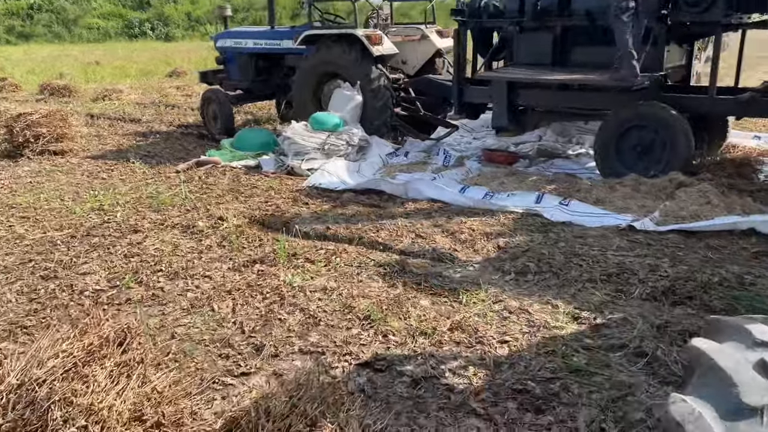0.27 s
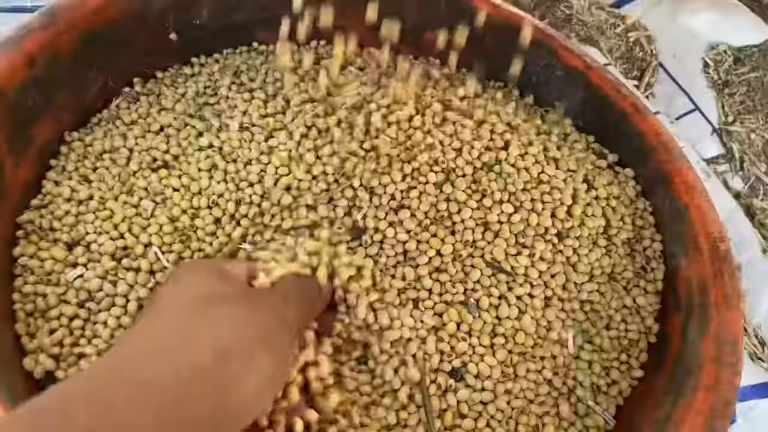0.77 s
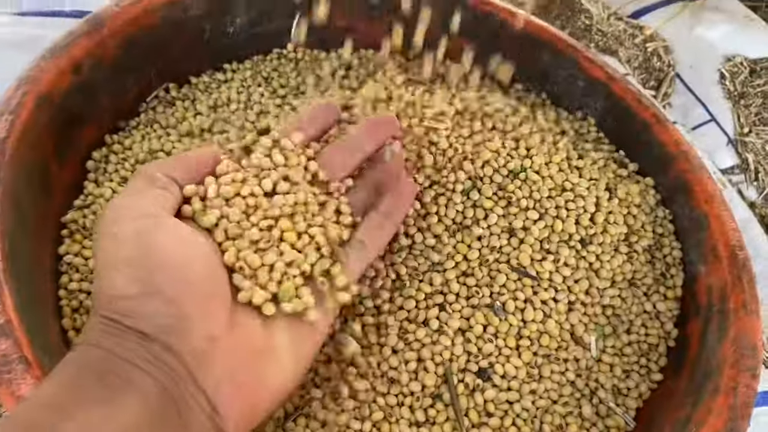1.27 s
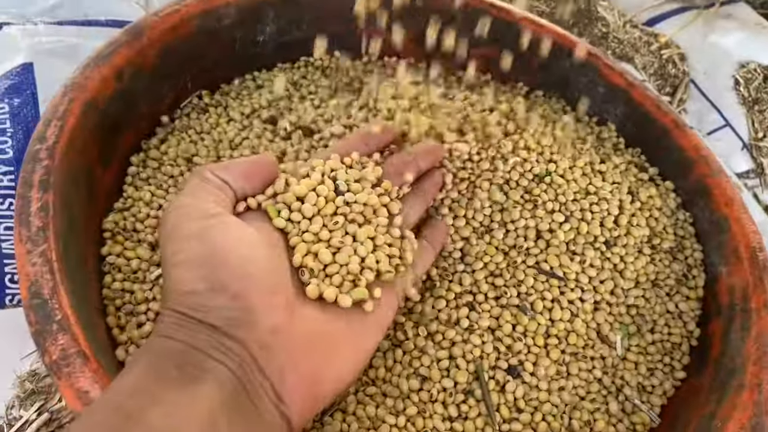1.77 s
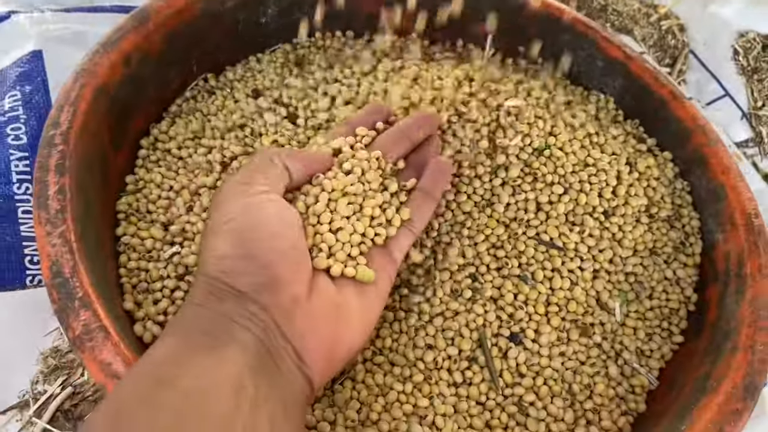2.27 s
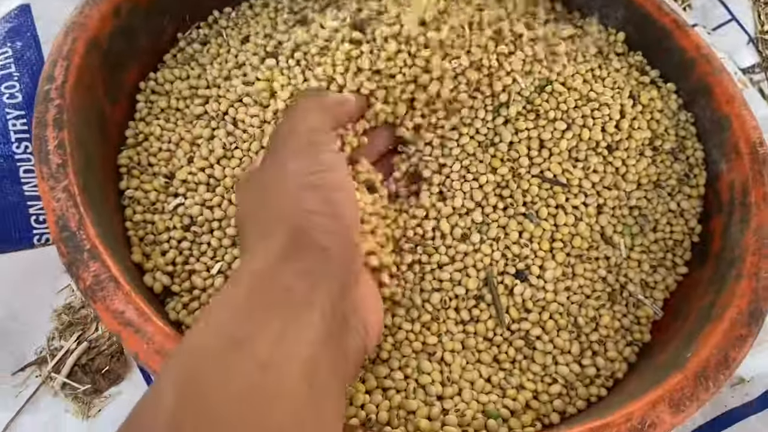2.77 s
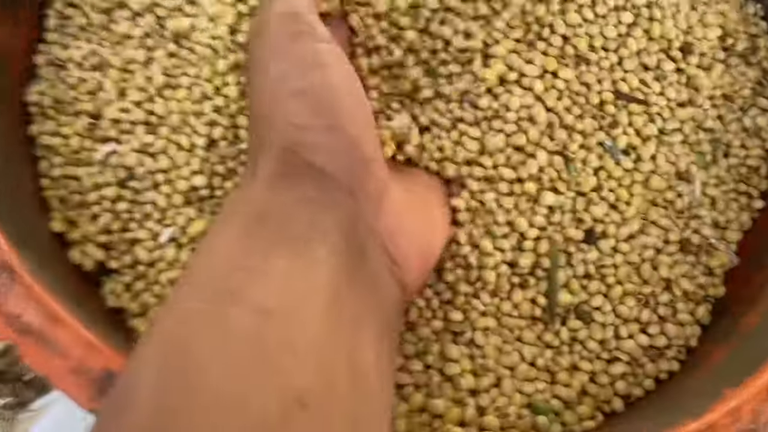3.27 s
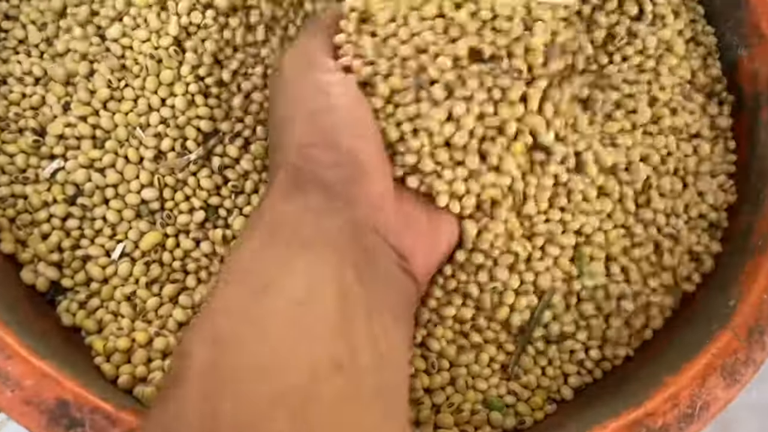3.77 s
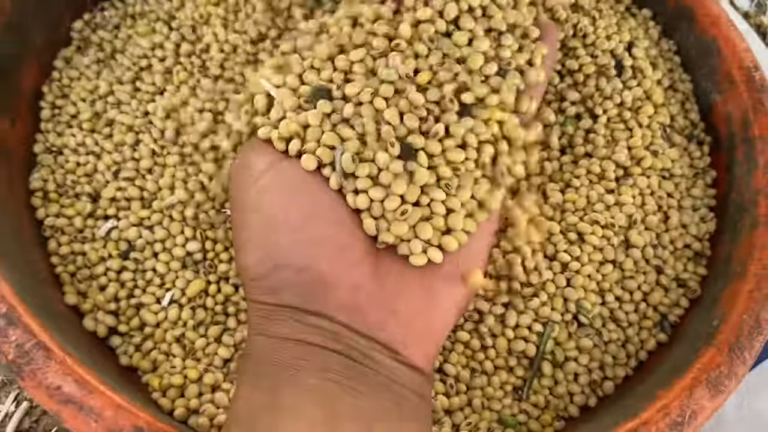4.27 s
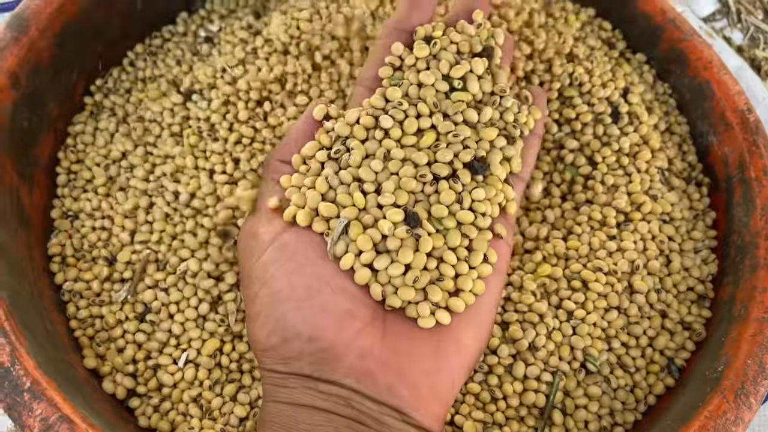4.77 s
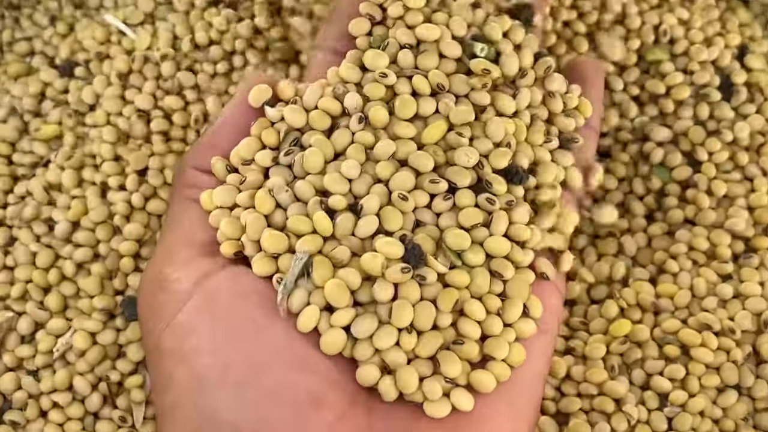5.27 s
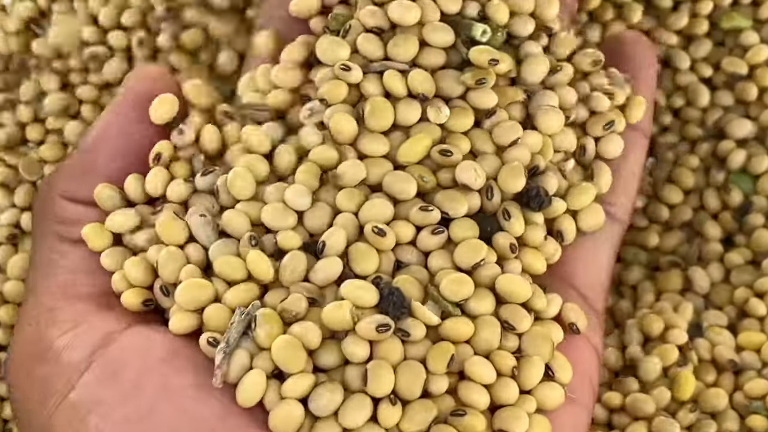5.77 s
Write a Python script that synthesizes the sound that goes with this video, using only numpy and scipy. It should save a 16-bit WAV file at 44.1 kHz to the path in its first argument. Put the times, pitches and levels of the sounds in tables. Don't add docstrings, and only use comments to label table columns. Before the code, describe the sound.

A low, buzzing tractor exhaust beats slowly against the thresher's blower, first heard across open ground with thinner hissing rattle. After a brief cut the sound is close, fuller and brighter: rumbling drum, rushing straw and dense beans pulsing rapidly with the sieve. Little muffled puffs punctuate it, and the bean rattle rises slightly near the end as the phone lowers toward the tub.

```python
import sys
import numpy as np
from scipy import signal
from scipy.fft import rfft, irfft, next_fast_len
from scipy.io import wavfile
from scipy.ndimage import uniform_filter1d, map_coordinates

SR = 44100
rng = np.random.default_rng(int(sys.argv[2]) if len(sys.argv) > 2 else 0)


def file_out(sig):
    cols = np.atleast_2d(sig).T
    lim = np.clip(cols, -1, 1)
    pcm = np.round(lim * 32767).astype(np.int16)
    wavfile.write(sys.argv[1], SR, pcm)


def boost_factor(decibels):
    exponent = np.asarray(decibels, float) / 20
    return 10 ** exponent


N = 264732
CHANGE_S, FADE_OUT_S, GAP_S, FADE_IN_S = .69, .007, .003, .027


def unit(x):
    return x / np.sqrt(np.mean(x ** 2) + 1e-20)


def along(points, hz):
    f, v = np.transpose(points)
    return np.interp(np.log(hz + 1), np.log(f + 1), v)


def curves(rows):
    s, *cols = np.transpose(rows)
    return [np.interp(np.arange(N) / SR, s, c) for c in cols]


def ramp(start_s, takes_s):
    return np.clip((np.arange(N) / SR - start_s) / takes_s, 0, 1)


def wobble(rate_hz):
    at = np.arange(0, N + 64, 64)
    knots = rng.standard_normal(int(N * rate_hz / SR) + 4)
    return np.interp(np.arange(N), at, map_coordinates(knots, [at * rate_hz / SR]))


def filtered(x, response):
    m = next_fast_len(N + 8192, True)
    return irfft(rfft(x, m) * response(np.fft.rfftfreq(m, 1 / SR)), m)[..., :N]


# time_s, firing_hz
FIRING_RATE = [(0, 39.93), (.69, 39.93), (.7, 40.55), (2.2, 40.7), (3.8, 40.79), (5, 40.76), (6, 40.67)]


def crank():
    return 2 * np.pi * np.cumsum(curves(FIRING_RATE)[0]) / SR + 0.046 * wobble(6)


# phase_rad, smear_rad, turned_over_above_multiple, firing_moment_s
EXHAUST_PIPE = [
    (4, 0, 0, .198),
    (-.8, -.68, 2.5, 3.4215),
]


def pipe_lag(k, shot):
    start, smear, flip, _ = EXHAUST_PIPE[shot]
    turned_over = np.pi * (k > flip > 0)
    late = 1.2 * (k % 1 > 0 or k > 2.1 * flip > 0)
    return start + smear * k * (k - 9) + turned_over - late


# firing_multiple, far_db, near_db
EXHAUST_ORDERS = [(1, -40, -19.5), (1.5, -53, -40), (2, -22, -15.5), (2.5, -49, -43), (3, -29, -28),
                  (4, -27, -18.5), (4.5, -53, -25), (5, -26.5, -16.5), (5.5, -49, -56), (6, -33, -32),
                  (7, -54, -30.5), (8, -42.5, -27.5), (9, -56, -30), (9.5, -49, -48), (10, -49, -27.5),
                  (10.5, -52, -38), (14, -52, -41), (15, -53, -45), (16, -60, -44.5)]
# firing_multiple, far_db, near_db, far_in_step_s, near_in_step_s
BLOWER_ORDERS = [(1, -41, -38, 0.27, 4), (2, -20.5, -23.5, 0.72, 3.027), (3, -35, -24, 0.39, 3.34),
                 (4, -41, -36, 0.37, 3.105), (5, -42, -83, 0.25, 3.5), (6, -38, -39, 0.268, 3.2),
                 (7, -54, -44, 0.27, 3.3)]


def engine(turn, shot, unsteady_db):
    belt_ratio = .98625
    turn = turn - turn[round(EXHAUST_PIPE[shot][3] * SR)]
    out = 0
    for k, *db in EXHAUST_ORDERS:
        shake_db = unsteady_db * np.sqrt(k) * (wobble(8.3) + 0.65 * wobble(24.63))
        phase = k * turn + pipe_lag(k, shot) + 0.096 * unsteady_db * k * wobble(13)
        out = out + boost_factor(db[shot] + 2.5 + shake_db) * np.cos(phase)
    for k, *row in BLOWER_ORDERS:
        step = turn[round(row[2 + shot] * SR)]
        phase = k * (step + belt_ratio * (turn - step)) + pipe_lag(k, shot)
        out = out + boost_factor(row[shot] + 1 + 1.2 * wobble(3.9)) * np.cos(phase)

    def placing(hz):
        return boost_factor([[-.75], [.75]]) * np.exp([[-.0006j], [.0006j]] * hz)

    return filtered(np.array([out, out]), placing)


# frequency_hz, likeness
PORT_LIKENESS = [(40, 0.82), (150, 0.96), (340, 0.87), (860, 0.6), (1400, 0.26), (1900, 0.33), (3000, 0.26),
                 (4000, 0.61), (5300, 0.28), (6500, 0.67), (8000, 0.92), (14000, 0.29)]
# frequency_hz, left_lead_rad
PORT_LEAD = [(60, 1), (340, 0.08), (1120, 1.5), (1900, -0.3), (2900, 0.5), (4000, -1.06), (5000, 0.2),
             (6400, -0.04), (8200, -3.5), (11500, -6.5), (15000, -10.5)]
# frequency_hz, left_minus_right_db
PORT_LEAN = [(60, 4), (300, -6), (600, 0.2), (1200, -2), (2500, 0.1), (5000, 2.5), (9000, -1)]


def ports(hz):
    turn = np.arccos(np.clip(along(PORT_LIKENESS, hz), -1, 1)) / 2
    half = boost_factor(along(PORT_LEAN, hz) / 2) * np.exp(.5j * along(PORT_LEAD, hz))
    return np.cos(turn), np.sin(turn), np.array([half, 1 / half])


def rush(colour, patchy_db, grain_db):
    raw = rng.standard_normal((2, N)) * boost_factor(grain_db * rng.standard_normal(N))
    z = signal.stft(raw, nperseg=512)[2]
    field = uniform_filter1d(rng.standard_normal(z.shape[1:]), size=5, axis=0)
    field = uniform_filter1d(field, size=5, axis=1)
    pair = signal.istft(z * boost_factor(patchy_db * unit(field)), nperseg=512)[1][:, :N]
    m = next_fast_len(N, True)
    hz = np.fft.rfftfreq(m, 1 / SR)
    shared, unrelated, half = ports(hz)
    common, apart = rfft(pair, m) * colour(hz) * [shared, unrelated]
    return unit(irfft(half * [common + apart, common - apart], m)[:, :N])


def shaped(spectrum):
    return lambda hz: boost_factor(along(spectrum, hz))


# time_s, feed_db
CROP_FEED = [(0, 0), (.25, .5), (.68, 1), (.74, -0.5), (1.5, 0.8), (2, 0), (3.2, -0.45), (3.9, 1),
             (4.8, -0.5), (5.1, .5), (5.4, -.5), (5.7, .5), (6, -0.5)]
FEED_SHARE = (1.1, 1.4, 0.39)
# frequency_hz, density_db_per_hz
BEAN_SPRAY = [(5000, -42), (8500, 9), (10500, 0.5), (13000, -10), (16000, -8)]


def thresher(turn, levels_db, drum, straw, beans, shake_db):
    sieve_hz, loudest_s = 11.97, 3.019
    feed_db = curves(CROP_FEED)[0]
    drum_db, straw_db, beans_db = (db + share * feed_db for db, share in zip(levels_db, FEED_SHARE))
    beans_db = beans_db + 2.5 * ramp(4.88, 0.62)
    swing = np.sin(2 * np.pi * sieve_hz * (np.arange(N) / SR - loudest_s) + 1.86)
    sieve_db = shake_db * swing * (1 + 0.35 * wobble(3.0))
    load_db = 0.51 * wobble(8.1) + 0.27 * wobble(25.08)

    drum_db = drum_db + 10.0 + 0.3 * np.cos(turn)
    straw_db = straw_db + 0.28 * np.cos(turn / 3) + 0.69 * np.cos(turn) + 0.21 * sieve_db + load_db
    rattle_db = beans_db + 3.0 + sieve_db + load_db
    spray_db = beans_db - 10 + 2.4 * sieve_db + 1.6 * wobble(10)

    rumble = boost_factor(drum_db) * rush(shaped(drum), patchy_db=0.5, grain_db=0.7)
    thrash = boost_factor(straw_db) * rush(shaped(straw), patchy_db=1.85, grain_db=2.0)
    rattle = boost_factor(rattle_db) * rush(shaped(beans), patchy_db=1.28, grain_db=2.5)
    spray = boost_factor(spray_db) * rush(shaped(BEAN_SPRAY), patchy_db=3.0, grain_db=1.5)
    return rumble + thrash + rattle + spray


# centre_s, pitch_hz, length_s, level_db
STRAW_WADS = [
    (.005, 1300, .02, -34.5),
    (0.405, 1350, 0.027, -34),
    (1.148, 1250, .03, -34),
    (1.377, 1400, 0.029, -26),
    (1.549, 1500, .04, -34),
    (3.52, 5170, .025, -26),
    (4.704, 1300, 0.038, -29.5),
    (5.701, 1500, 0.024, -24),
    (5.75, 5000, .03, -29),
]


def clumps():
    size = 8192
    out = np.zeros((2, N + size))
    t = (np.arange(size) - size // 2) / SR
    f = np.fft.rfftfreq(size, 1 / SR)
    for s, hz, length, db in STRAW_WADS:
        band = np.exp(-(np.log((f + 1) / hz) / 0.31) ** 2)
        puff = unit(irfft(rfft(rng.standard_normal((2, size))) * band, size))
        out[:, round(s * SR):][:, :size] += boost_factor(db) * np.exp(-(t / length) ** 2 * 1.1) * puff
    return out[:, size // 2:][:, :N]


# pitch_hz, level_db, loudest_s (quietest_s if the fall is negative), fall_db_per_s
GEAR_WHINES = [
    (749.4, -39.5, 2, 1),
    (1101, -38, 1.7, 2.2),
    (1460, -36, 4.86, 6.5),
    (2216, -42.5, 5, 8.5),
    (598, -34, 4.5, -0.5),
]
# pitch_hz, width_hz
GEAR_WIDTH = [(590, 45), (750, 14), (1110, 16), (1450, 75), (2200, 60)]


def gears():
    t = np.arange(N) / SR
    out = 0
    for hz, db, s, fall_db in GEAR_WHINES:
        width_hz = along(GEAR_WIDTH, hz)
        level_db = db - fall_db * abs(t - s) + 1.45 * wobble(20)
        whine = rush(lambda f: 1 / (1 + ((f - hz) / width_hz) ** 2), patchy_db=-1.5, grain_db=0)
        out = out + boost_factor(level_db) * whine
    return out


# frequency_hz, density_db_per_hz
RUMBLE_FAR = [(20, -40), (35, -13), (60, -8), (100, -10.5), (200, -11), (300, -17), (540, -18),
              (660, -25.5), (900, -34), (1300, -66)]
# frequency_hz, density_db_per_hz
RUMBLE_NEAR = [(20, -31), (40, -6), (80, -2), (140, -8), (165, -2), (203, 1), (225, -9), (260, -10.5),
               (320, -7), (400, -0.5), (440, -11.5), (510, -15.5), (600, -15), (1000, -34)]
# frequency_hz, density_db_per_hz
THRASH_FAR = [(500, -40), (900, -13.5), (1150, -3), (1450, -5), (1680, -7), (1850, -17), (2200, -14),
              (3000, -30.5)]
# frequency_hz, density_db_per_hz
THRASH_NEAR = [(500, -16), (800, 2), (1100, -1), (1250, -2), (1480, -2), (1800, -6.5), (2500, -9.5),
               (3500, -32)]
# frequency_hz, density_db_per_hz
RATTLE_FAR = [(1200, -30), (2200, 1.5), (3000, -4), (4500, -4), (6500, -8), (8000, -7.5), (10000, -10.5),
              (13000, -14), (16000, -15)]
# frequency_hz, density_db_per_hz
RATTLE_NEAR = [(1200, -7.5), (2000, -0.5), (2600, 2.5), (3200, 0), (4200, 0.5), (6500, -1), (8000, -3),
               (10000, -9.5), (13000, -13.5), (16000, -12)]


def scene():
    turn = crank()
    far_db, near_db = (-38.5, -36, -39.5), (-29, -31, -29.5)
    far = engine(turn, shot=0, unsteady_db=.09)
    far = far + thresher(turn, far_db, RUMBLE_FAR, THRASH_FAR, RATTLE_FAR, shake_db=0.0)
    near = engine(turn, shot=1, unsteady_db=.13) + gears()
    near = near + thresher(turn, near_db, RUMBLE_NEAR, THRASH_NEAR, RATTLE_NEAR, shake_db=1.07)
    leaving = 1 - ramp(CHANGE_S, FADE_OUT_S)
    arriving = ramp(CHANGE_S + FADE_OUT_S + GAP_S, FADE_IN_S)
    return leaving * far + arriving * near + clumps()


# low_hz, high_hz, edge_scatter_hz, start_s, spared_s
SUM_GAPS = [
    (7720, 8900, 40, 0, .71),
    (8200, 8900, 330, 0, .71),
    (13900, 22000, 380, 0, 1.555),
    (15300, 22000, 0, 0, .71),
]
# low_hz, high_hz, edge_scatter_hz, start_s, spared_s
DIFFERENCE_GAPS = [
    (10050, 13150, 330, 0, 1.138),
    (3000, 6450, 400, 5.15, 0),
]


def kept(bands, hz, t):
    spared_half_s = .021
    keep = np.ones((len(hz), len(t)))
    for low, high, scatter, since, spared in bands:
        edge = scatter * np.round(abs(rng.standard_normal((2, len(t))))) * [[-1], [1]]
        on = (t > since) * (abs(t - spared) > spared_half_s)
        on = on * (abs(t - CHANGE_S - spared_half_s) > spared_half_s)
        keep *= 1 - (hz[:, None] > low + edge[0]) * (hz[:, None] < high + edge[1]) * on
    return keep


def low_pass(x):
    return signal.sosfilt(signal.butter(12, 15850, fs=SR, output="sos"), x)


def record(dry):
    ceiling, frame, lead_in = .96, 1024, 280
    x = dry / (1 + abs(dry / ceiling) ** 5) ** (1 / 5)
    x = np.pad(x, [(0, 0), (lead_in, 0)])
    hz, t, z = signal.stft([x[0] + x[1], x[0] - x[1]], SR, "cosine", nperseg=2 * frame)
    z = z * [kept(SUM_GAPS, hz, t), kept(DIFFERENCE_GAPS, hz, t)]
    pair = signal.istft(z, SR, "cosine", nperseg=2 * frame)[1]
    both, apart = pair[:, lead_in:][:, :N] / 2
    return low_pass(np.array([both + apart, both - apart]))


dry = scene()
out = record(dry)
file_out(out)
```